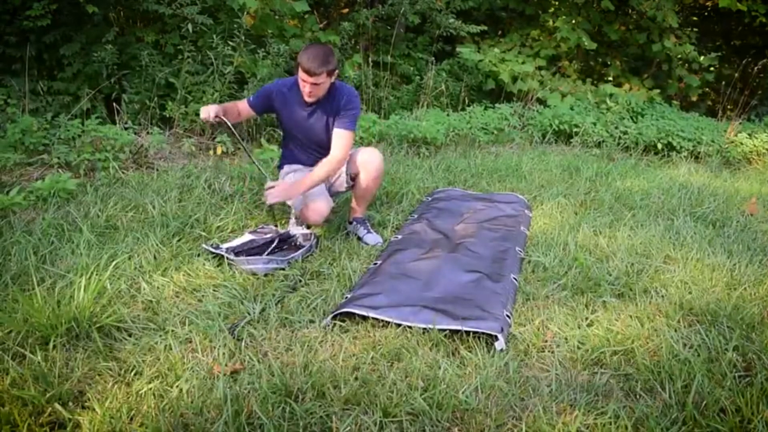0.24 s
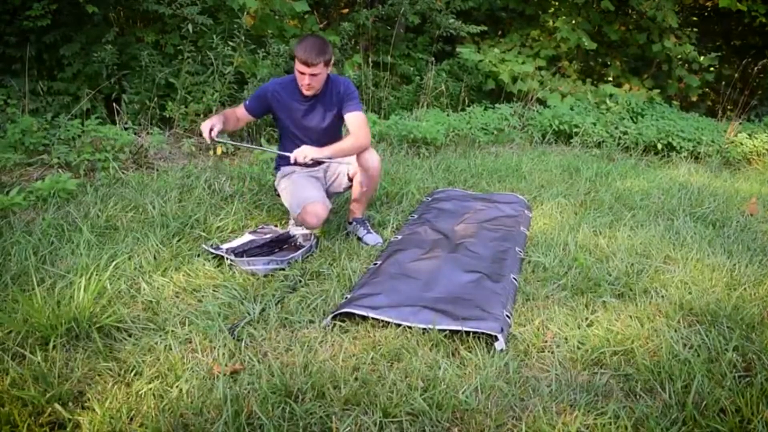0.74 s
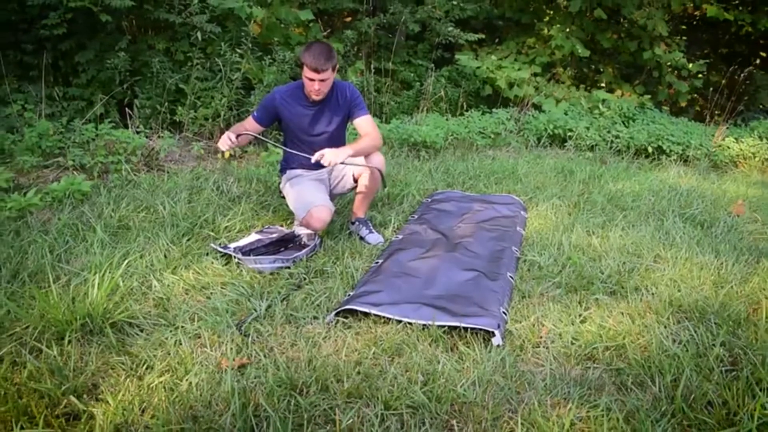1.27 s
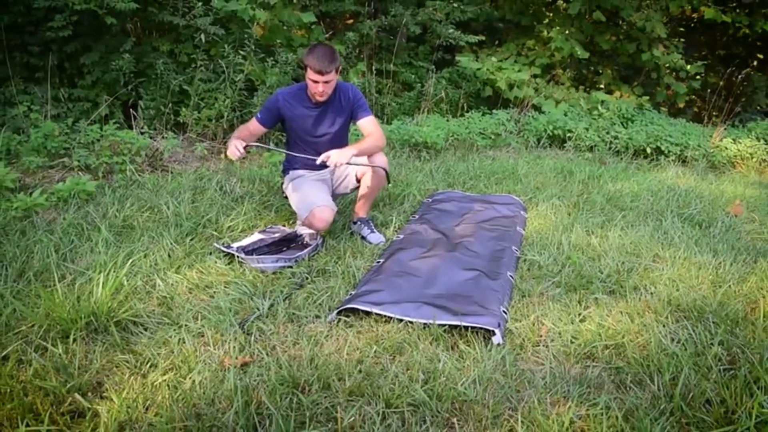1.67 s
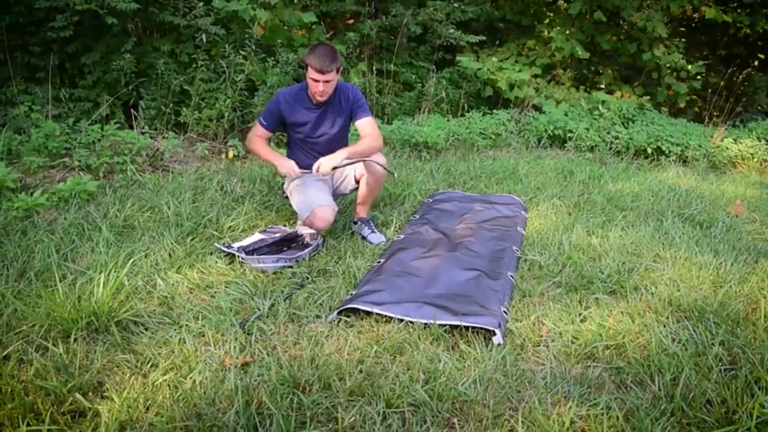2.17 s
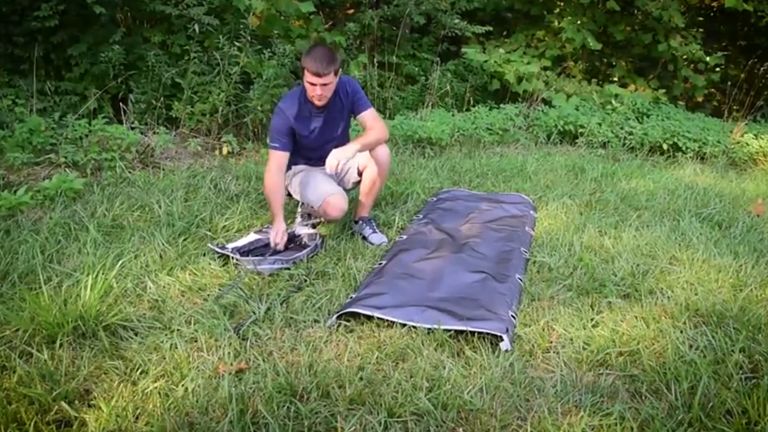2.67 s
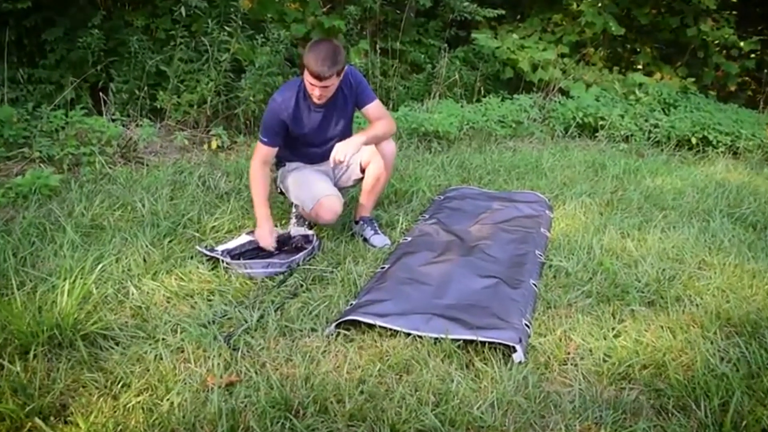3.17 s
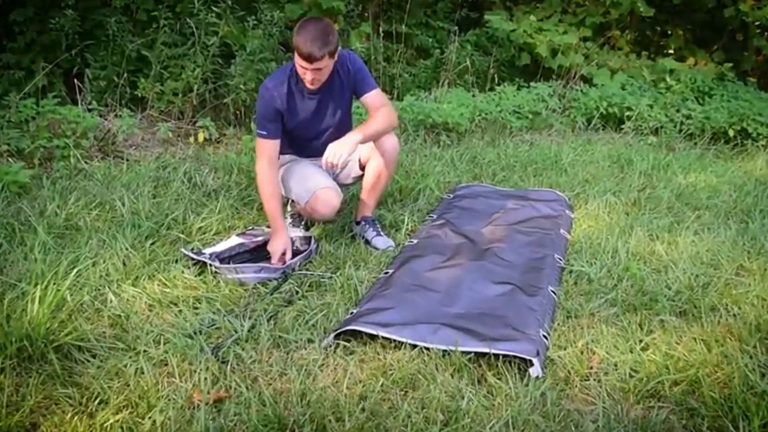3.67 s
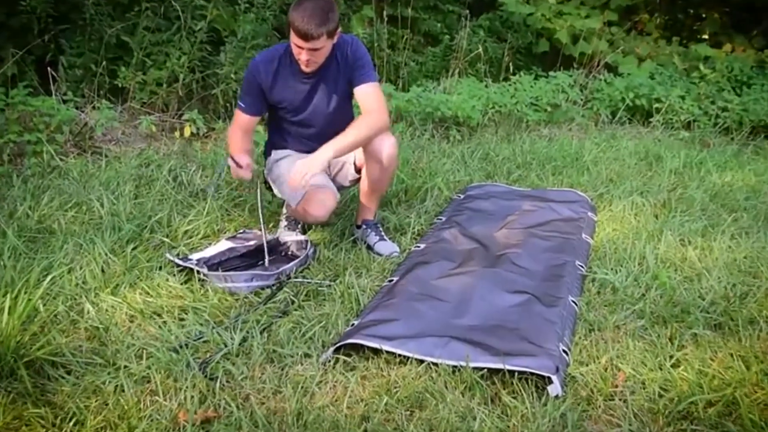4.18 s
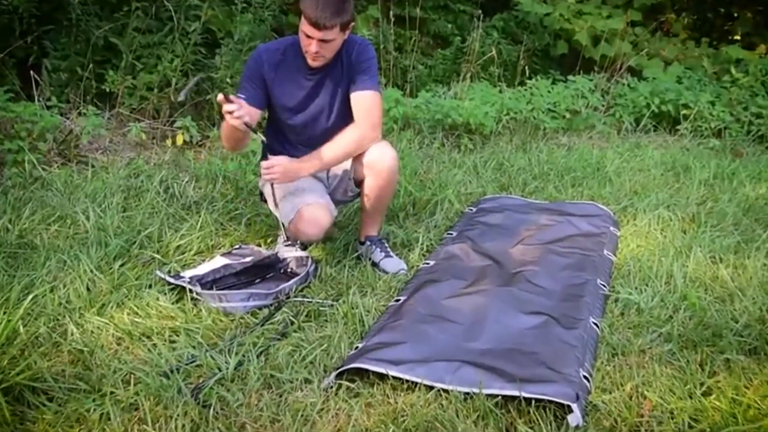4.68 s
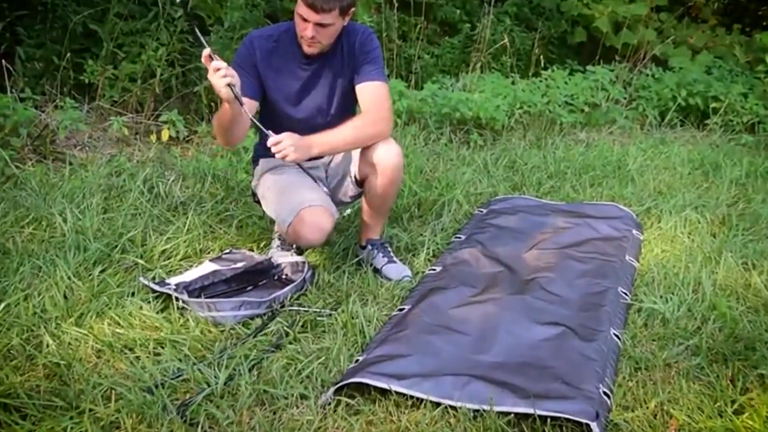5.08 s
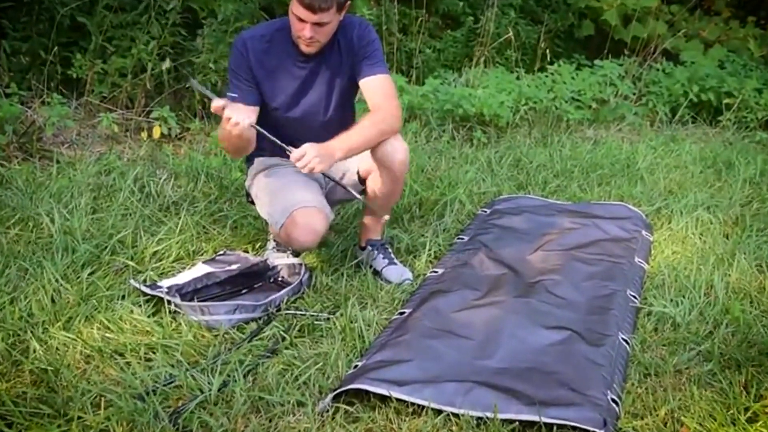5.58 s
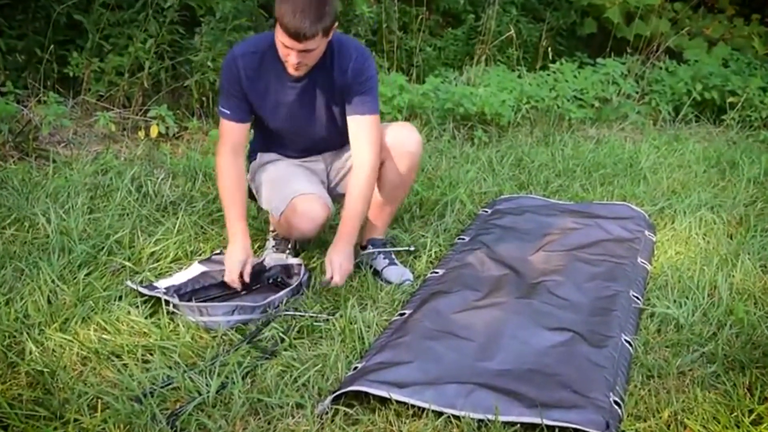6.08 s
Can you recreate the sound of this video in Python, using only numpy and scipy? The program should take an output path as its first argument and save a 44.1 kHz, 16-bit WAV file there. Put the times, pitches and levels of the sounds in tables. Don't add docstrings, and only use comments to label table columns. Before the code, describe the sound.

Thin aluminium tubes click, ring briefly and slide into one another between crackles of a cloth bag, with distant cicadas buzzing all through.

```python
import sys
import numpy as np
from scipy import signal
from scipy.fft import rfft, irfft
from scipy.io import wavfile
from scipy.ndimage import uniform_filter1d

SR = 44100
rng = np.random.default_rng(int(sys.argv[2]) if len(sys.argv) > 2 else 0)


def transcribe(u):
    v = np.clip(np.atleast_2d(u).T, -1, 1)
    q = np.round(v * 32767).astype(np.int16)
    wavfile.write(sys.argv[1], SR, q)


def ratio(d):
    e = np.asarray(d, float) / 20
    return 10 ** e


N = 279153

# (time [s], level [dB])
CHORUS_SWELL = [(0.0, -50.5), (0.21, -50.5), (0.65, -51), (1.11, -50), (1.57, -47.5), (2.01, -51.5),
                (2.57, -50), (2.8, -50.5), (3.03, -53.5), (3.35, -54), (3.7, -56.5), (4.09, -49),
                (4.53, -50.5), (5.41, -48), (5.8, -52), (6.01, -52), (6.33, -56.5)]
# (frequency [Hz], density [dB per Hz])
CICADA_COLOUR = [(1060, -42), (1800, -31), (2090, -24.5), (2250, -14.5), (2330, -14.5), (3040, -7),
                 (3310, -1), (3740, -1.5), (4110, 0), (5400, -1.5), (6410, -1.5), (8660, -14.5),
                 (10000, -22), (13000, -17.5), (22000, -120)]
# (frequency [Hz], density [dB per Hz])
AIR_COLOUR = [(20, -14), (50, 2), (110, 1.5), (250, -4), (600, -8.5), (1500, -10), (5000, -6), (9000, -32),
              (15000, -35)]
# (frequency [Hz], density [dB per Hz])
HISS_COLOUR = [(30, -7.5), (200, -1.5), (1400, -6), (7000, -7.5), (15000, -12)]
# (frequency [Hz], width [Hz], level [dB])
CLOTH_FOLDS = [(478, 220, 11.5), (668, 190, -2), (953, 790, 15.5), (1600, 760, 6)]
# (start
# [s], hold [s], rustle [dB], crispness [dB])
HANDFULS = [(.0, 0.34, -51, -9), (0.047, 0.056, -40, -14), (0.195, 0.032, -46.5, -3),
            (.25, 0.065, -48, -19), (0.357, 0.032, -49.5, -3), (0.413, .06, -55.5, -9),
            (1.008, 0.017, -56.5, -25), (1.812, 0.027, -52, 6.5), (2.314, 0.011, -63, 4),
            (2.952, 0.034, -49, -17), (3.002, 0.094, -61.5, -12), (3.33, 0.018, -58.5, -2),
            (3.413, 0.59, -53.5, -6), (3.439, 0.044, -47, -21), (3.51, 0.031, -51, -7),
            (3.568, .05, -48.5, -3), (3.653, 0.099, -43, -9), (3.793, 0.015, -42.5, -12),
            (3.893, 0.051, -42, -11), (4.006, 0.16, -56.5, -11), (4.13, 0.041, -51, -14),
            (4.262, 0.03, -44, -1), (4.373, 0.045, -48.5, -6.5), (4.75, 0.023, -44.5, -9),
            (4.796, 0.12, -63, -13), (5.389, 0.072, -47, -12), (5.79, 0.0051, -62, -13),
            (6.11, 0.093, -51.5, -7), (6.219, .035, -47.5, -6), (6.27, 0.054, -47.5, 1)]
# (frequency [Hz], level [dB])
TUBE_MODES = [(530, -16), (1430, 1), (1900, -8.5), (2450, 4), (2950, 14.5), (3700, 11), (5150, 7.5)]
# (time [s], peak [dB], loudest ring [Hz], chatter [ms], grip [dB])
RIM_STRIKES = [(.039, -26.5, 3260, 4.8, 9), (.103, -28, 3100, 7.6, 5), (.282, -17.5, 3100, 2.55, -2),
               (.352, -20.5, 3270, 2.5, 1), (1.853, -14, 3230, 3.1, -7), (3.653, -18, 3800, 1.7, -7),
               (3.666, -23, 2700, 2.8, 8), (3.709, -21, 3200, 2, -18), (3.7375, -18, 2830, 2.2, 4.5),
               (3.8, -28.5, 2950, 3.4, 8), (3.885, -20, 3060, 3.7, 0), (4.082, -39.5, 2900, 4.7, 14.5),
               (4.161, -18.5, 1950, 2.7, -1.5), (4.25, -28.5, 1870, 4.8, 7), (4.276, -19, 4520, 1.55, -6),
               (4.526, -24.5, 3220, 2.6, -1), (4.683, -28.5, 1860, 1.5, -22), (4.731, -32, 930, 3.6, -4),
               (4.828, -33, 1090, 3.1, 11.5), (4.845, -33.5, 4500, 1.3, 9.5), (4.88, -37.5, 1600, 2.1, 10),
               (5.4709, -9, 3550, 1.42, 4), (4.268, -20, 750, 1.6, -18), (4.5325, -15.5, 3060, 2.06, 1)]
# (time [s], peak [dB], frequency [Hz], t60 [s])
LOOSE_RINGS = [
    (.042, -33, 3050, 0.1),
    (.250, -39, 1410, 0.14),
    (.355, -43, 3400, 0.093),
    (3.712, -37, 3200, 0.1),
    (3.712, -37, 500, 0.14),
    (3.938, -41, 2900, 0.064),
    (.355, -38, 516, 0.18),
    (5.4712, -17, 3800, 0.011),
    (1.3971, -42, 1900, 0.025),
    (1.3971, -38, 1500, 0.03),
]
# (time [s], peak [dB], loudest ring [Hz], chatter [ms])
WALL_CLACKS = [(.069, -13.5, 3240, 4.1), (.376, -35.5, 2780, 4.6), (.7065, -29, 3730, 2.3),
               (1.037, -35.5, 2300, 2.8), (1.235, -40.5, 4220, 3.1), (1.3976, -18, 3920, 1.64),
               (2.892, -38, 1920, 2), (2.983, -38, 1600, 2.5), (3.543, -29, 5300, 3.1),
               (3.731, -23.5, 2790, 3), (3.747, -23.5, 1570, 1.7), (3.891, -20, 2160, 5.3),
               (3.905, -27, 2370, 1.9), (4.702, -42, 1170, 1.4), (4.518, -29.5, 3120, 2.7),
               (5.3755, -30.5, 3524, 6), (4.535, -26.5, 1430, 4.9), (4.771, -32, 1100, 2.5),
               (4.821, -42, 1230, 1.6), (4.886, -36.5, 5800, 1.9), (5.4745, -22, 3120, 0.49),
               (5.799, -40, 4800, 3.6), (6.2125, -14.5, 2120, 2), (6.2155, -15, 2760, 2.4),
               (5.468, -20, 3680, 1.6), (6.2765, -12.5, 4400, 0.98), (6.2946, -17, 4850, 1.1),
               (6.3263, -19.5, 3480, 1.4)]
# (time [s], peak [dB], loudest ring [Hz], chatter [ms])
MUFFLED_KNOCKS = [(.072, -17, 4100, 7.2), (.125, -33, 2360, 2.8), (.185, -39, 3400, 3.9),
                  (.2445, -29, 855, 1.5), (.308, -32, 1510, 3), (.401, -41, 4200, 2.2),
                  (.469, -34.5, 4220, 5.5), (.7054, -29.5, 1510, 1.7), (1.3924, -31, 1700, 3),
                  (2.311, -40, 3900, 2.1), (3.323, -43, 790, 4.6), (3.406, -40.5, 1030, 5.3),
                  (3.441, -39, 1410, 2.7), (3.481, -38, 1400, 3.9), (3.503, -28.5, 2730, 2.5),
                  (3.515, -22.5, 3270, 1.27), (3.587, -30.5, 1420, 3.1), (3.633, -33, 2800, 3.8),
                  (3.911, -27.5, 2370, 3.5), (3.937, -46, 2840, 3.3), (3.961, -35.5, 5200, 12),
                  (3.993, -38.5, 1700, 3.7), (4.1495, -24.5, 2280, 3.7), (4.286, -25, 4730, 1.9),
                  (4.326, -35.5, 5640, 4.6), (4.749, -17, 4570, 3.5), (4.781, -39, 1780, 2),
                  (4.813, -33, 1140, 4), (6.186, -33, 590, 9.9), (6.243, -39, 2710, 2.6)]
# (first slip [s], last slip [s], peak [dB], ring [Hz])
SLIDES = [
    (1.81, 1.828, -37.5, 2500),
    (5.385, 5.4142, -22.5, 3070),
    (5.425, 5.459, -24.5, 2800),
]
# (time [s], level [dB])
CABLE_SHAKE = [
    (5.36, -78),
    (5.372, -73),
    (5.38, -59),
    (5.482, -58),
    (5.52, -103),
    (5.53, -77),
]


def set_rms(x, db):
    return x * ratio(db) / np.sqrt(np.mean(x ** 2))


def ring(x, hz, width_hz):
    b, a = signal.iirpeak(np.clip(hz, 30, .44 * SR), hz / width_hz, fs=SR)
    return signal.lfilter(b, a, x)


def coloured(points):
    hz, db = np.transpose(points)
    bins = np.arange(1, N // 2 + 2) * SR / N
    gain = ratio(np.interp(np.log(bins), np.log(hz), db))
    return irfft(rfft(rng.standard_normal(N)) * gain, N)


def walk(rate_hz):
    hold = int(SR / rate_hz)
    steps = np.repeat(rng.standard_normal(N // hold + 1), hold)
    return 1.25 * uniform_filter1d(uniform_filter1d(steps, hold), hold)[:N]


def fader(points, rest_db):
    s, db = np.transpose(points)
    return ratio(np.interp(np.arange(N) / SR, s, db, rest_db, rest_db))


def cicadas():
    drone = coloured(CICADA_COLOUR)
    voices = 0
    for hz in 2200 * 1.25 ** np.arange(8):
        swell_db, buzz_db = 0.72 * walk(2.75), walk(40)
        voices = voices + ratio(swell_db + buzz_db) * ring(drone, hz, hz / 4)
    return set_rms(voices, 0) * fader(CHORUS_SWELL, rest_db=-48)


def open_air():
    return set_rms(coloured(AIR_COLOUR), -57) * ratio(1.6 * walk(8))


def handling():
    grip_db_per_s, let_go_db_per_s = 612, 456
    t = np.arange(N) / SR
    folds, face = 0, 0
    for s, hold, db, crisp_db in HANDFULS:
        swell_db = -grip_db_per_s * np.maximum(s - t, 0)
        fade_db = -let_go_db_per_s * np.maximum(t - s - hold, 0)
        power = ratio(db + swell_db + fade_db) ** 2
        folds = folds + power
        face = face + power * ratio(crisp_db) ** 2
    return np.sqrt(folds), np.sqrt(face)


def bag():
    snaps = rng.standard_normal(N) * ratio(2.5 * rng.exponential(size=N))
    snaps = set_rms(snaps, 0) * ratio(2.6 * walk(150))
    folds = 0
    for hz, width, db in CLOTH_FOLDS:
        fold = ring(ring(snaps, hz, width), hz, 3 * width)
        folds = folds + ratio(db + 2.4 * walk(60)) * fold
    face = ring(ring(snaps, 2590, 2600), 2840, 3400)
    dull, crisp = handling()
    return dull * set_rms(folds, 0) + crisp * set_rms(face, 0)


def contact(hz, thud_db, tick_db, chatter_s, sharpness, spiky_db, tube_db, body_db):
    t = np.arange(3072) / SR
    chance = rng.standard_normal((3, len(t)))
    settle = np.exp(-t / np.clip(chatter_s, .0005, .02))
    rattle = ratio(-20.5) * settle ** .22
    onset = np.minimum(t / (0.43 * chatter_s), 1)
    bounces = chance[0] * ratio(spiky_db * chance[1]) * (settle + rattle) * onset
    struck = ring(ring(bounces, hz, hz / sharpness + 300), hz, 4 * hz / sharpness + 400)
    tube = 0
    for k, (mode_hz, db) in enumerate(TUBE_MODES):
        detuned_hz = mode_hz * (1 + .02 * chance[2, -k - 1])
        tube = tube + ratio(db + 4 * chance[2, k]) * ring(bounces, detuned_hz, 150)
    body = ring(ring(bounces, 1840, 3000), 1800, 2800)
    thud = ring(ring(bounces, 790, 710), 210, 630)
    tick = ring(ring(bounces * np.exp(-t / 0.0027), 6550, 3000), 4500, 6500)
    parts = [(struck, 0), (tube, tube_db), (body, body_db), (thud, thud_db + 5), (tick, tick_db - 4.5)]
    return sum(ratio(db) * part / np.abs(part).max() for part, db in parts)


def poles(table, thud_db, tick_db, sharpness=7.1, spiky_db=2.0, tube_db=-3.5, body_db=0.5, gain_db=-5.0):
    out = np.zeros(N + 4096)
    for s, db, hz, chatter_ms, *grip_db in table:
        i = int(s * SR)
        blow = contact(hz, thud_db + sum(grip_db), tick_db, chatter_ms / 1000,
                       sharpness, spiky_db, tube_db, body_db)
        out[i:i + 3072] += ratio(db + gain_db) * blow
    return out[:N]


def rim_strikes():
    return poles(RIM_STRIKES, thud_db=-14.5, tick_db=0)


def loose_rings():
    out, t = np.zeros(N + 8192), np.arange(8192) / SR
    for s, db, hz, t60 in LOOSE_RINGS:
        push = rng.standard_normal(len(t)) * np.exp(-np.log(1000) * t / t60)
        tone = ring(ring(push, hz, 130), hz, 300)
        i = int(s * SR)
        out[i:i + len(t)] += ratio(db) * tone / np.abs(tone).max()
    return out[:N]


def wall_clacks():
    return poles(WALL_CLACKS, thud_db=-39.5, tick_db=-81)


def muffled_knocks():
    return poles(MUFFLED_KNOCKS, thud_db=-10.5, tick_db=-22)


def slips():
    every_s, jitter_s, scatter_db, detune, chatter_ms = .009, .0005, 1.6, .07, 1.2
    catch_s, catch_db = .0021, -4
    rows = []
    for first, last, db, hz in SLIDES:
        times = np.linspace(first, last, round((last - first) / every_s) + 1)
        for s, chance in zip(times, rng.standard_normal((len(times), 4))):
            at = s + jitter_s * chance[0]
            peak_db = db + scatter_db * chance[1]
            rows.append((at, peak_db, hz * (1 + detune * chance[2]), chatter_ms))
            rows.append((at + catch_s, peak_db + catch_db, hz * (1 + detune * chance[3]), chatter_ms))
    return rows


def ferrule_slides():
    return poles(slips(), thud_db=-56, tick_db=-31, sharpness=6, spiky_db=3, tube_db=-14, body_db=-9, gain_db=0)


def cable_shake():
    rumble = ring(rng.standard_normal(N), 71, 60)
    return set_rms(rumble, 0) * fader(CABLE_SHAKE, rest_db=-110)


def scene():
    metal = rim_strikes() + loose_rings() + wall_clacks() + muffled_knocks() + ferrule_slides()
    near_and_chorus = cicadas() + bag() + metal + cable_shake()
    left = ratio(6) * near_and_chorus + open_air()
    return np.array([left, np.zeros(N)])


def low_pass(x):
    return signal.sosfilt(signal.butter(12, 16430, fs=SR, output="sos"), x)


def record(dry):
    microphone = signal.butter(2, 12500, fs=SR, output="sos")
    heard = signal.sosfilt(microphone, dry)
    hiss = np.array([set_rms(coloured(HISS_COLOUR), db) for db in (-63, -60)])
    top_cut = signal.ellip(8, .2, 45, 15200, fs=SR, output="sos")
    mix = signal.sosfilt(top_cut, heard + hiss)
    return low_pass(mix)


dry = scene()
out = record(dry)
transcribe(out)
```